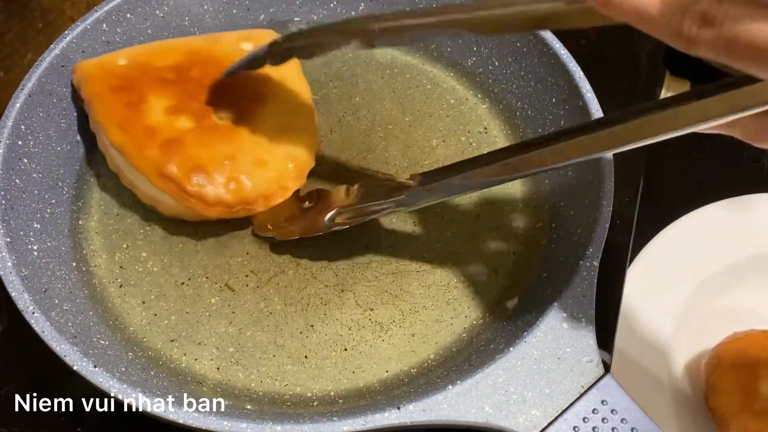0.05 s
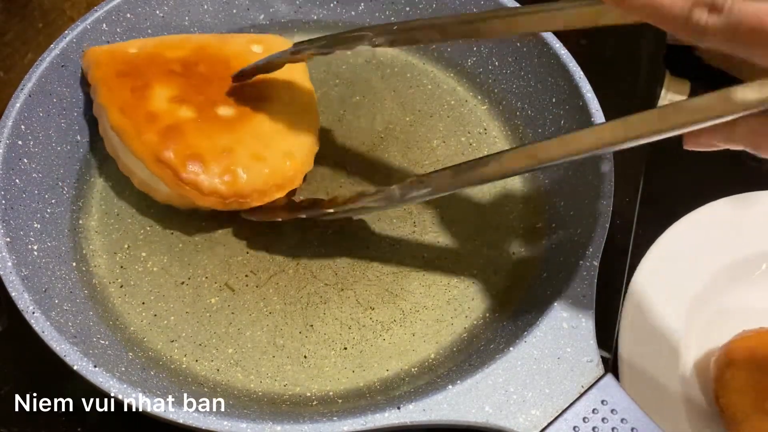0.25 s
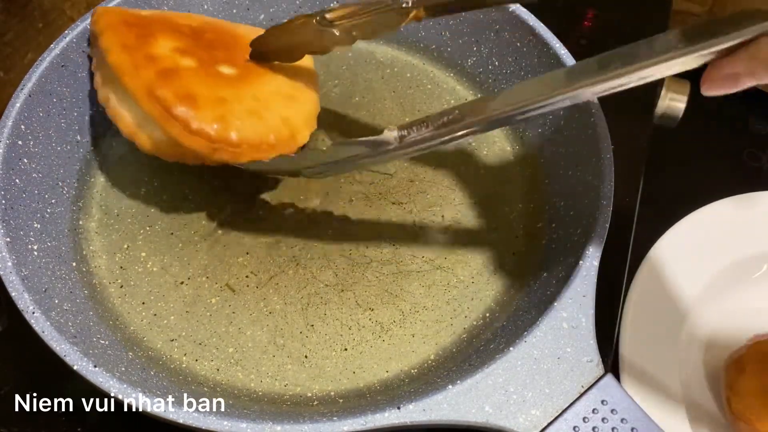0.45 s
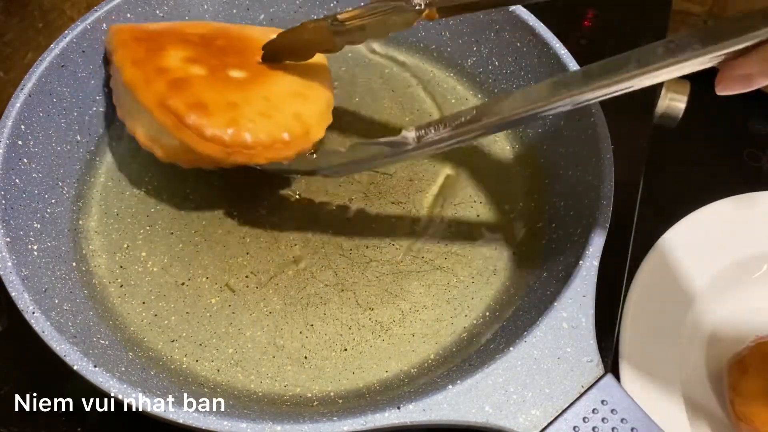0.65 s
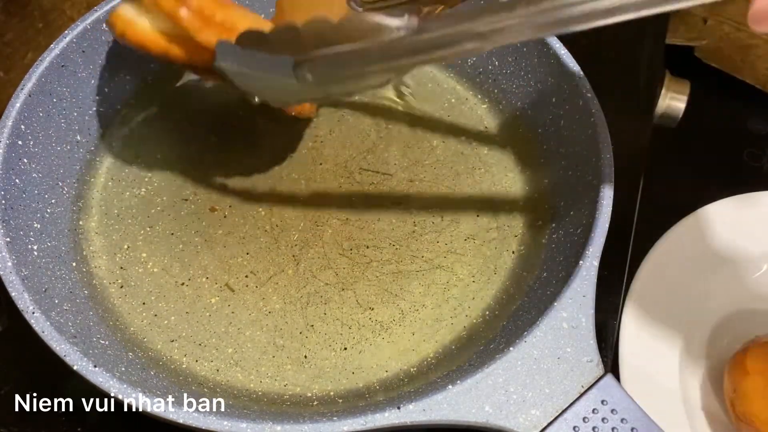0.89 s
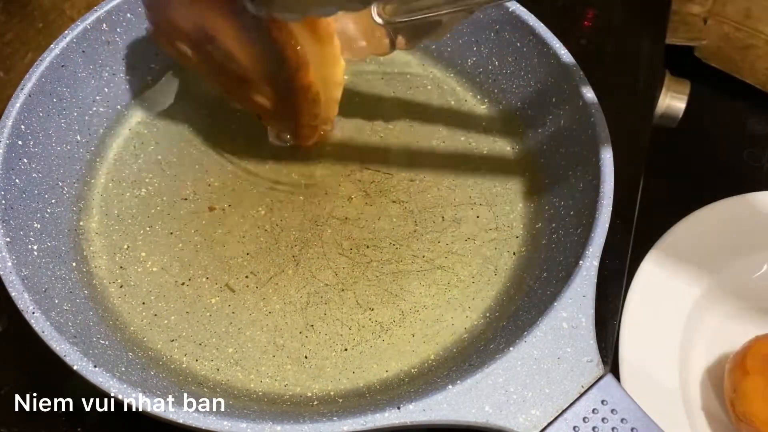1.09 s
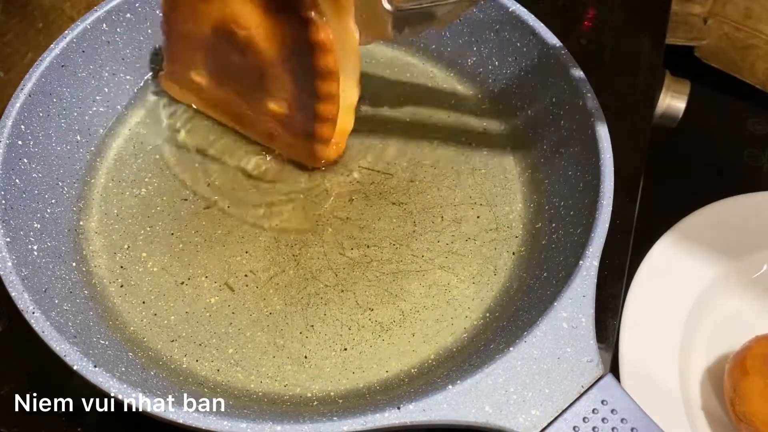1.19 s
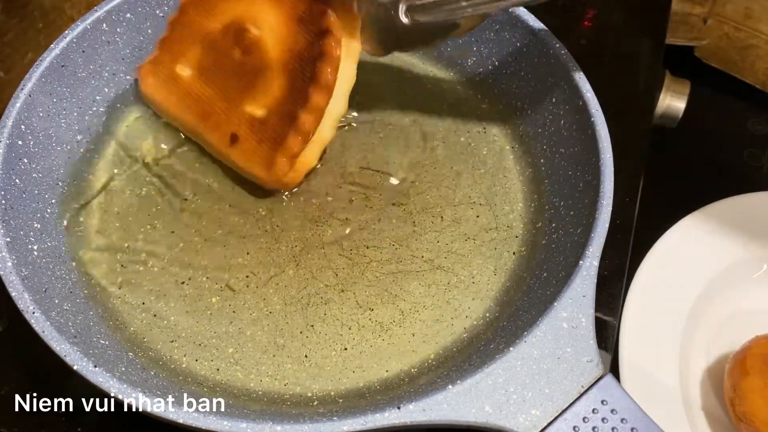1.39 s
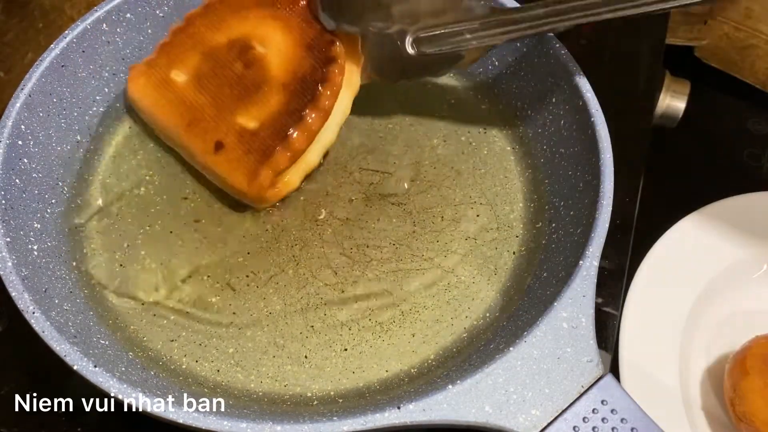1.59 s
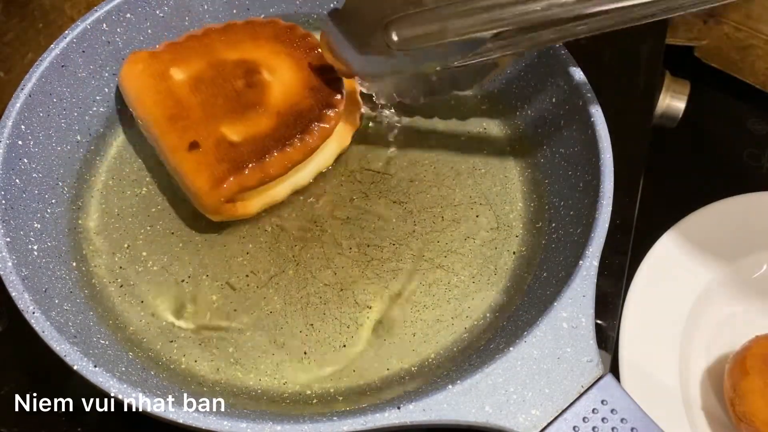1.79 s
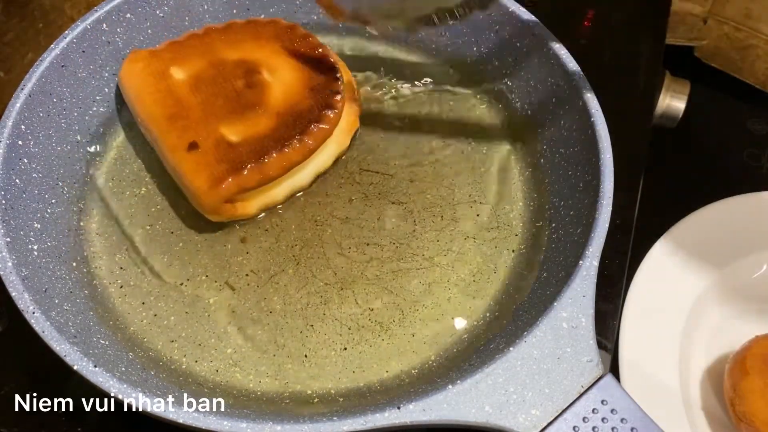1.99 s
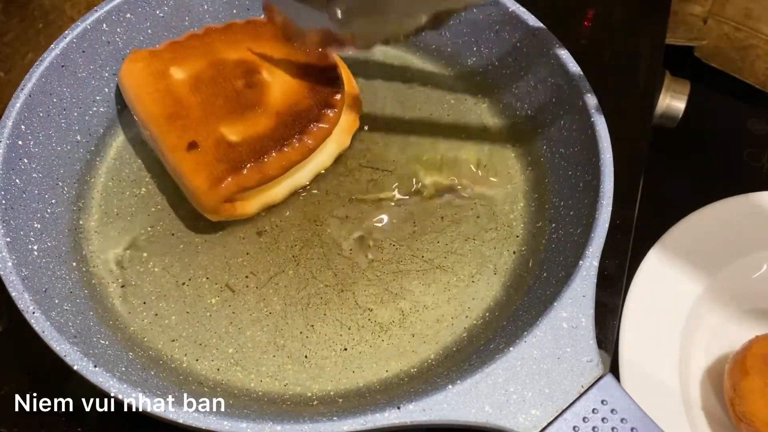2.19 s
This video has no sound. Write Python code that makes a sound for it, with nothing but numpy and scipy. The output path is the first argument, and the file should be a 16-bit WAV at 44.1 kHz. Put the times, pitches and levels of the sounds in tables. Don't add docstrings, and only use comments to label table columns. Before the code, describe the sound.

Metal tongs clack against a frying pan in a small kitchen. Thin scratchy scrapes start at once, with a soft low knock, then a loud clack at about 0.23 seconds rebounds quickly, thudding and ringing briefly. After a quiet gap, gritty scrapes return around 1.05 to 1.35 seconds, faintly near 1.7 and 2.2. An extractor fan hums and hisses steadily throughout, heard close in stereo.

```python
import sys
import numpy as np
from scipy import signal
from scipy.fft import rfft, irfft, next_fast_len
from scipy.io import wavfile
from scipy.ndimage import map_coordinates

SR = 44100
rng = np.random.default_rng(int(sys.argv[2]) if len(sys.argv) > 2 else 0)


def volts_from_db(level):
    exponent = np.asarray(level, float) / 20
    return 10 ** exponent


def transcribe(signal):
    frames = np.atleast_2d(signal).T
    limited = np.clip(frames, -1, 1)
    pcm = np.round(limited * 32767).astype(np.int16)
    wavfile.write(sys.argv[1], SR, pcm)


N = 99225

# f/Hz, level/dB (rms), width/Hz
BLADE_LINES = [
    (99, -54, 8),
    (272.3, -49.5, 4),
    (544.6, -50, 2.5),
    (1089, -52.5, 3),
]
BLADE_LINE_SIDE_DB = [-28, -20.5, -22.5, -9.5]
# f/Hz, density/dB per Hz
RUSH_MID = [(22, -52), (38, 5), (91, -3.5), (241, -9.5), (272, -9), (503, -0.5), (527, -12), (644, 0.5),
            (1500, -16), (1950, -10), (3300, -120)]
RUSH_SIDE = [(15, -59), (25, -18), (240, -13), (266, -15.5), (501, -6), (537, -8), (928, -3.5), (1500, -13),
             (1950, -44), (3300, -120)]
# f/Hz, density/dB per Hz
HISS_MID = [(1500, -6.5), (1850, -12.5), (2250, 2), (2600, -7), (5300, -13), (6000, -21.5), (9000, -30),
            (15800, -42.5)]
HISS_SIDE = [(900, -54), (1500, 5.5), (2130, 2), (5000, -5), (9000, -53), (15700, -38), (15800, -94)]
# f/Hz, left over right/dB
FAN_BALANCE = [(40, 1), (120, 1), (700, 4), (2400, 0), (4400, 6), (9000, -39)]
# t/s, level/dB, rise/s, t60/s, brightness/dB
SLIPS = [(0.036, -35, 0.0011, 0.02, -1.5), (0.104, -44, 0.0034, 0.051, -0.5), (.128, -57, .003, 0.055, -2),
         (0.149, -40.5, 0.0034, 0.046, 1.5), (0.172, -50.5, .003, 0.075, 0), (0.193, -45, 0.0051, 0.098, 2),
         (0.209, -48, 0.005, 0.03, -3), (.255, -51, 0.017, 0.32, -1), (.81, -61, 0.0045, 0.063, 6),
         (1.056, -47, 0.0011, 0.055, 1.5), (1.084, -45, 0.0045, 0.15, 2), (1.1, -39, .003, 0.15, 2.5),
         (1.142, -52, 0.0027, 0.047, -1), (1.163, -41.5, .001, 0.041, 0.5),
         (1.215, -49.5, 0.014, 0.33, 0.5), (1.246, -50, 0.0071, 0.27, 1), (1.29, -38.5, 0.013, 0.11, 0.5),
         (1.325, -53, .01, 0.12, 1), (1.61, -56.5, .004, 0.3, -1), (1.65, -63, .004, 0.15, -2),
         (1.69, -49.5, 0.0048, 0.1, 0), (1.714, -39.5, 0.0066, 0.041, -2.5),
         (2.168, -42, 0.0015, 0.027, 2.5)]
# f/Hz, width/Hz, level/dB
TIP_MODES = [(8000, 500, -3), (8900, 350, -2), (9900, 350, 1), (11400, 200, -3), (13400, 600, -10),
             (14900, 1000, -15)]
# f/Hz, width/Hz, level/dB
ARM_MODES = [(2550, 300, -1), (3700, 500, -4), (4700, 400, -2), (6200, 200, 2), (6900, 400, -4)]
# t/s, level/dB, f/Hz, t60/s
PAN_ROCKS = [
    (0.036, -25.5, 104, .13),
    (.265, -28.5, 84.4, 0.25),
]
# t/s, level/dB, ring/dB, brightness/dB
STRIKES = [
    (.227, -9, 0, 0),
    (.2345, -12, -30, -6),
    (.245, -20, -30, 6),
    (.293, -20, -30, -2),
    (.314, -28, -30, -2),
]
RING_HZ = [360, 480, 1780, 959, 948, 1160, 1415, 1552, 2215, 2229, 4942, 5082, 5340, 6697]
# level/dB, t60/s, left over right/dB, attack/s
RING_MODES = [(-7, 0.062, -2, 0.0046), (-12.5, 0.15, 21, 0.01), (-9.5, 0.058, -7, .001), (0, .13, -5, .003),
              (-5, .35, 14, .03), (-37, 0.14, -3, .001), (-8, 0.045, -16, 0.00083), (-8.5, 0.084, -6, .001),
              (-9, .05, 8, .0005), (-15, .31, 14, .001), (-26, .14, 3, .001), (-21, .17, 7, .006),
              (-25, .16, 4, .002), (-26.5, 0.093, 3, .001)]
# f/Hz, density/dB per Hz
THUD_SPECTRUM = [(60, -51), (140, -17.5), (220, -10), (700, -2.5), (1500, -2.5), (3000, -15.5), (6000, -33),
                 (15500, -46)]
# f/Hz, t60/s
THUD_DECAY = [(200, 0.22), (500, 0.14), (1500, 0.065), (4000, 0.067), (10000, 0.22)]
# f/Hz, t60/s
KITCHEN_DECAY = [(200, 0.26), (1000, 0.46), (4000, 0.24), (12000, 0.18)]
# f/Hz, common share
KNOCK_COMMON = [(100, 0.97), (300, 0.84), (600, 0), (1000, 0)]
# f/Hz, common share
FRONT_SHARE = [(3000, 0), (5500, .3), (8400, .78), (10500, .97), (13000, .99)]
# f/Hz, lead/cycles
RIGHT_LEAD = [(2000, 0), (4100, -.18), (5900, 0), (8450, .5), (10950, 1), (13250, 1.5), (15800, 2)]


def unit(x):
    return x / np.sqrt(np.mean(x ** 2) + 1e-20)


def along(points, hz):
    f, value = np.transpose(points)
    return np.interp(np.log(hz + 1), np.log(f + 1), value)


def filtered(x, response):
    n = x.shape[-1]
    m = next_fast_len(n + SR // 4)
    spectrum = rfft(x, m) * response(np.fft.rfftfreq(m, 1 / SR))
    return irfft(spectrum, m)[..., :n]


def resonances(table):
    def response(f):
        total = 0
        for k, (centre, width, db) in enumerate(table):
            mode = 1j * f * width / (centre * centre - f * f + 1j * f * width)
            total = total + (-1) ** k * volts_from_db(db) * mode
        return total
    return response


def coloured(spectrum):
    return unit(filtered(rng.standard_normal(N), lambda hz: volts_from_db(along(spectrum, hz))))


def dying(t60s):
    hz, t, z = signal.stft(rng.standard_normal((2, SR // 2)), SR, nperseg=128)
    decay = volts_from_db(-60 * t / along(t60s, hz)[:, None])
    return signal.istft(z * decay, SR, nperseg=128)[1][:, :SR // 2]


def sides(pan_db):
    return volts_from_db(np.array([[.5], [-.5]]) * pan_db)


def swell_and_die(age, db, rise, t60):
    return volts_from_db(db - 60 * age / t60) * (1 - np.exp(-age / rise))


def wander(n, width_hz):
    return np.cumsum(rng.standard_normal(n)) * np.sqrt(2 * np.pi * width_hz / SR)


def blend(x, share):
    mid, side = (x[0] + x[1]) / 2, (x[0] - x[1]) / 2
    side = filtered(side, lambda hz: np.sqrt(1 - np.clip(along(share, hz), 0, 1)))
    return np.array([mid + side, mid - side])


def fan():
    rush_db, rush_side_db, hiss_db, hiss_side_db = -41.5, -46, -54, -56.5
    wobble_db, wobble_hz = 0.8, 8
    mid = volts_from_db(rush_db) * coloured(RUSH_MID) + volts_from_db(hiss_db) * coloured(HISS_MID)
    side = volts_from_db(rush_side_db) * coloured(RUSH_SIDE) + volts_from_db(hiss_side_db) * coloured(HISS_SIDE)
    for (hz, db, width_hz), side_db in zip(BLADE_LINES, BLADE_LINE_SIDE_DB):
        phase = 2 * np.pi * hz * np.arange(N) / SR + wander(N, width_hz)
        mid = mid + volts_from_db(db) * np.sqrt(2) * np.sin(phase)
        side = side + volts_from_db(db + side_db) * np.sqrt(2) * np.cos(phase)
    swell = map_coordinates(rng.standard_normal(30), [np.arange(N) * wobble_hz / SR])
    stereo = np.array([mid + side, mid - side])
    return volts_from_db(wobble_db * swell) * filtered(stereo, lambda hz: sides(along(FAN_BALANCE, hz)))


def scrape():
    grit_db, grains_per_s, pan_db = 7, 2500, 6.5
    t = np.arange(N) / SR
    hits = (rng.random(N) < grains_per_s / SR) * rng.exponential(size=N)
    grit = rng.standard_normal((2, N)) * (1 + volts_from_db(grit_db) * hits)
    tips = unit(filtered(grit[0], resonances(TIP_MODES)))
    arms = unit(filtered(grit[1], resonances(ARM_MODES)))
    out = np.zeros(N)
    for s, db, rise, t60, bright_db in SLIPS:
        age = np.clip(t - s, 0, None)
        metal = volts_from_db(bright_db) * tips + volts_from_db(-bright_db) * arms
        out += swell_and_die(age, db, rise, t60) * metal
    return sides(pan_db) * out


def pan_rocking():
    rise_s = 0.014
    out = np.zeros(N)
    for s, db, hz, t60 in PAN_ROCKS:
        age = np.clip(np.arange(N) / SR - s, 0, None)
        out += swell_and_die(age, db, rise_s, t60) * np.sin(2 * np.pi * hz * age)
    return out


def clack():
    thud_db, thud_attack_s = -6, 0.0013
    crack_db, crack_t60 = -10.5, .006
    blur_hz = 1
    ring, body = np.zeros((2, N + SR)), np.zeros((2, N + SR))
    t = np.arange(SR // 2) / SR
    for s, db, ring_db, bright_db in STRIKES:
        at = slice(round(s * SR), round(s * SR) + len(t))
        for hz, (level, t60, pan_db, rise) in zip(RING_HZ, RING_MODES):
            shape = swell_and_die(t, db + ring_db + level, rise, t60)
            phase = 2 * np.pi * hz * t + wander(len(t), blur_hz * hz / 5000)
            ring[:, at] += sides(pan_db) * shape * np.sin(phase)

        def colour(hz):
            return volts_from_db(along(THUD_SPECTRUM, hz) + bright_db * np.log2(hz / 1000 + 0.23))

        thud = filtered(dying(THUD_DECAY), colour)
        thud = thud / np.std(thud[:, :SR // 100])
        thud = volts_from_db(thud_db) * thud * (1 - np.exp(-t / thud_attack_s))
        crack = unit(filtered(rng.standard_normal((2, len(t))), colour))
        crack = crack * volts_from_db(crack_db - 60 * t / crack_t60)
        body[:, at] += volts_from_db(db) * (thud + crack)
    return ring[:, :N], body[:, :N]


def room(x):
    delay_s = .004
    tail = dying(KITCHEN_DECAY)
    late = np.pad(x, ((0, 0), (round(delay_s * SR), 0)))
    return signal.fftconvolve(late, tail / np.linalg.norm(tail[0]), axes=1)[:, :N]


def scene():
    body_wet_db, ring_wet_db, scrape_wet_db = -12.5, -20, -10
    rub = scrape()
    ring, body = clack()
    answer = room(volts_from_db(body_wet_db) * body + volts_from_db(ring_wet_db) * ring)
    knock = blend(body + answer, KNOCK_COMMON)
    return fan() + rub + volts_from_db(scrape_wet_db) * room(rub) + pan_rocking() + ring + knock


def band_limit(x):
    return signal.sosfilt(signal.butter(12, 16810, fs=SR, output="sos"), x)


def record(dry):
    top_hz = 15800

    def lead(hz):
        cycles = np.interp(hz, *np.transpose(RIGHT_LEAD))
        return np.exp(np.array([[-1j], [1j]]) * np.pi * cycles)

    mix = filtered(blend(dry, FRONT_SHARE), lambda hz: lead(hz) * (hz < top_hz))
    return band_limit(mix)


dry = scene()
out = record(dry)
transcribe(out)
```